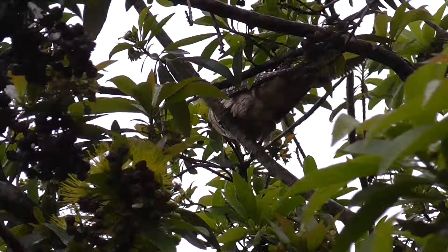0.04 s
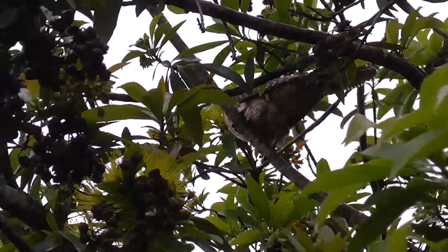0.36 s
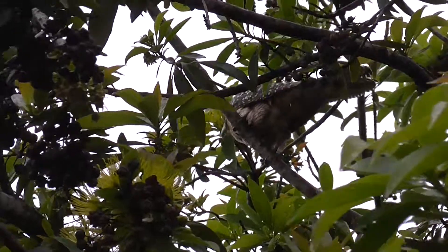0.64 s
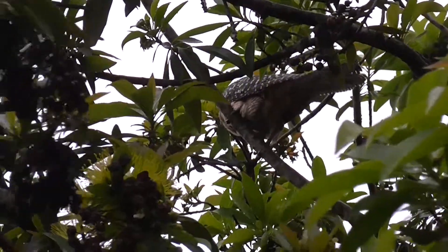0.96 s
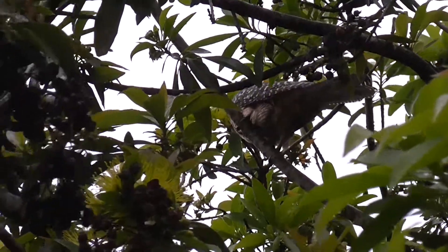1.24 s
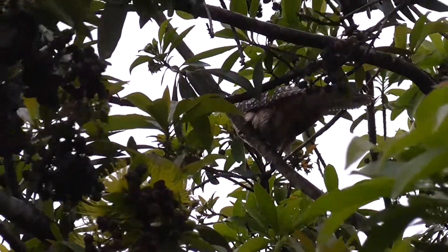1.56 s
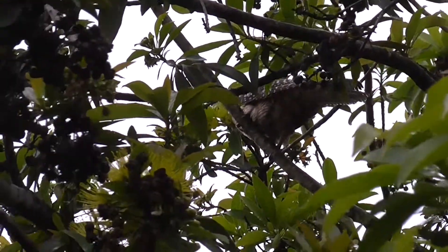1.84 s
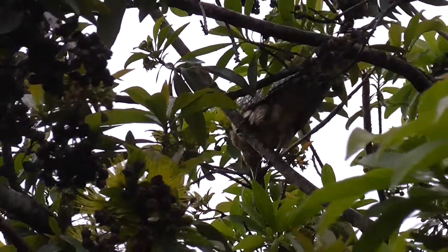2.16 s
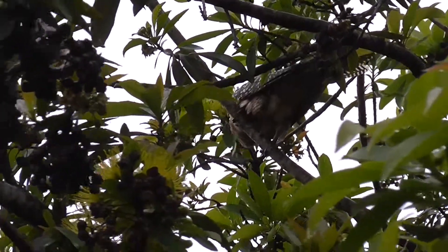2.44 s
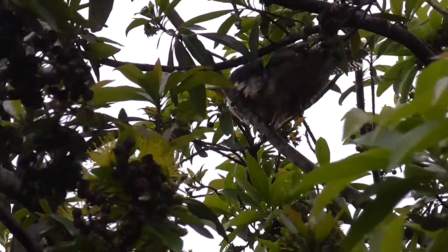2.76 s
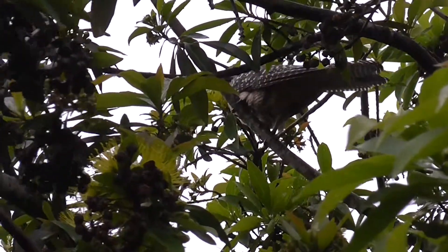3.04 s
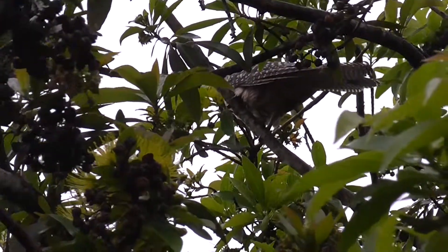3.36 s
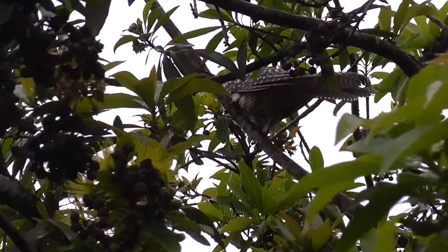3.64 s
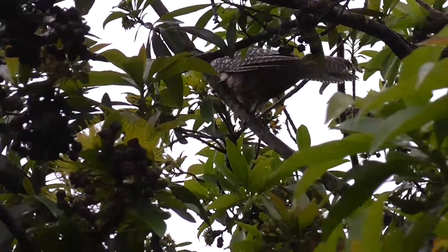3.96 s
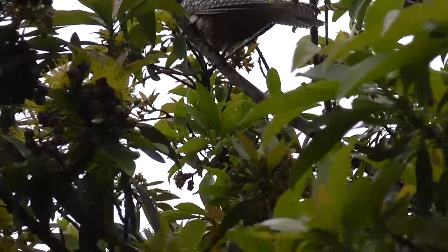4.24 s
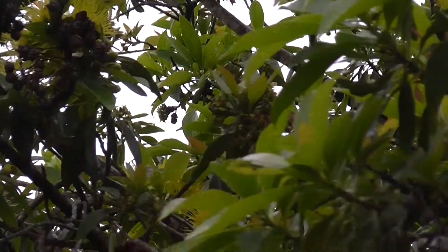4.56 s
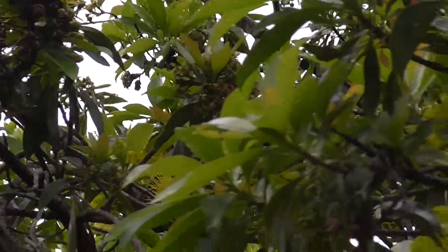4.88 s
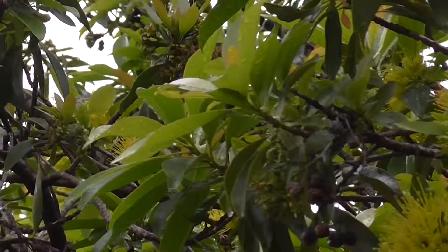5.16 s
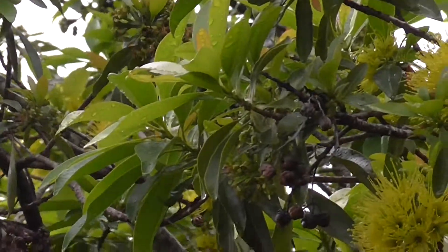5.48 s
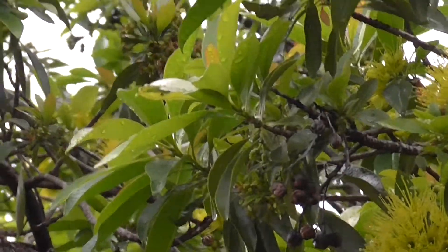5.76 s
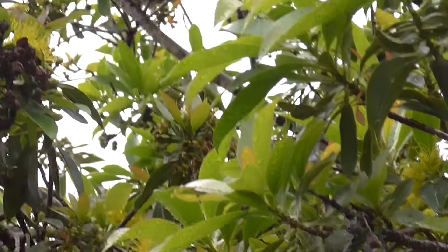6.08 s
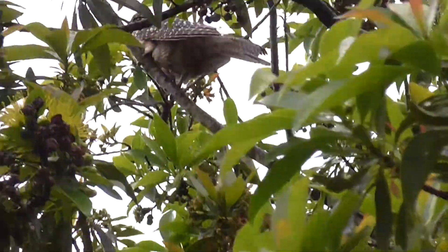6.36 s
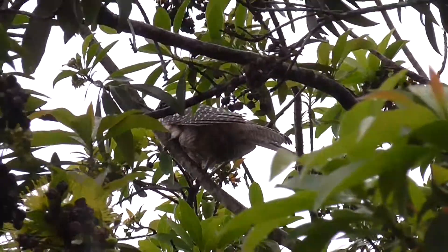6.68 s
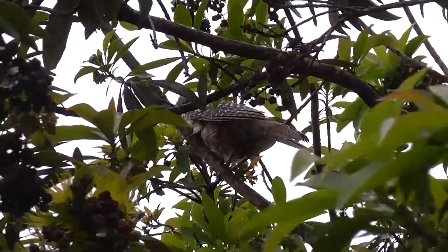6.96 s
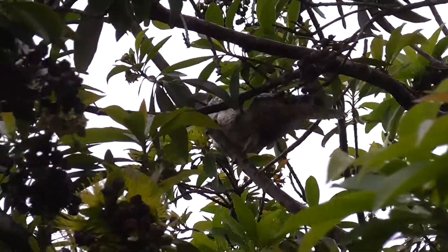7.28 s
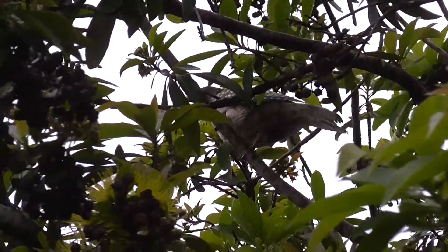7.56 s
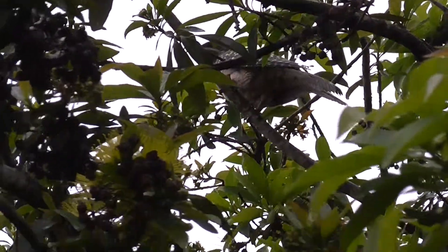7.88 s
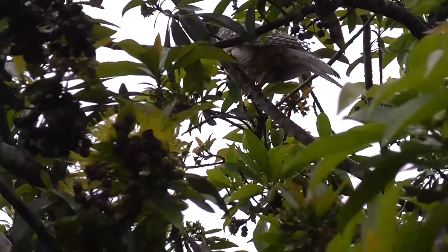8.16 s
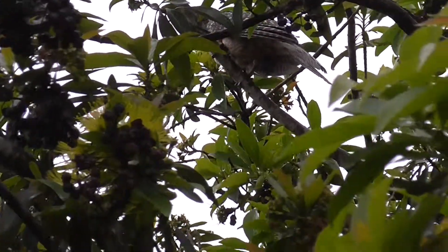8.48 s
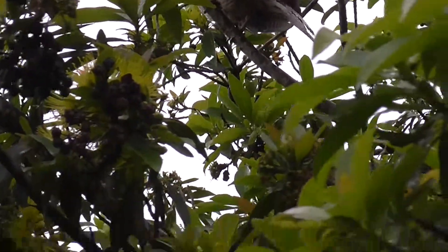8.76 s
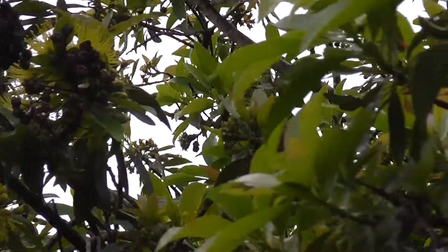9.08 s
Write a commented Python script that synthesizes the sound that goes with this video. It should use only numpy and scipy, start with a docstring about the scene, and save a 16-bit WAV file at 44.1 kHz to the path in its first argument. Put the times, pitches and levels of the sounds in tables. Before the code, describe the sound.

A koel shrieks close to the microphone in a leafy roadside tree. From the start until about 2.3 seconds it gives nine loud, harsh yelps in quick series, some short and arched, others cracking upward in pitch, the last ones weaker, each ringing briefly. A steady low traffic rumble dips under the calls and swells back afterwards. From about 2.6 to 4.5 seconds fainter birds whistle and whine nasally, with two clearer squeals just after 4 seconds. An engine hums on the road, changes gear near 3.5 seconds, climbs slowly, and drops again near 8 seconds. Twigs tick lightly now and then from about 3 seconds, and leaves rustle softly, most between 5 and 7.5 seconds. A faint low whine comes at 8.5 seconds, then the koel shrieks twice more, at about 8.7 and 9 seconds.

```python
"""Koel in a roadside tree

Close to the microphone a koel shrieks: short arched yelps and longer ones that crack upward in pitch,
each scattered by the branches. Fainter birds whine and whistle, leaves tick and rustle, and on the road
nearby an engine climbs slowly and changes gear. The camera's gain control ducks the steady background
under the shrieks and lets it swell back in the long pause."""
import sys
import numpy as np
from scipy import signal
from scipy.fft import rfft, irfft, next_fast_len
from scipy.io import wavfile
from scipy.ndimage import uniform_filter1d, minimum_filter1d, map_coordinates

SR = 44100
rng = np.random.default_rng(int(sys.argv[2]) if len(sys.argv) > 2 else 0)


def bounce(signal):
    """Save signal as a 16-bit WAV file at the path given by the first command-line argument."""
    frames = np.transpose(np.atleast_2d(signal))
    limited = np.clip(frames, -1, 1)
    pcm = np.round(limited * 32767).astype(np.int16)
    wavfile.write(sys.argv[1], SR, pcm)


N = 402191
TIME = np.arange(N) / SR


def amp(db):
    """Decibels to gain."""
    return 10 ** (np.asarray(db) / 20)


def unit(x):
    """Scale to rms 1."""
    return x / np.sqrt(np.mean(x ** 2) + 1e-20)


def along(points, hz):
    """Read (f/Hz, value) points on a log frequency axis."""
    f, v = np.transpose(points)
    return np.interp(np.log(hz + 1), np.log(np.abs(f) + 1), v)


def timeline(points):
    """Read (t/s, value) points at every sample."""
    return np.interp(TIME, *np.transpose(points))


def wobble(rate, size=N):
    """A smooth random curve, rate knots a second."""
    knots = rng.standard_normal(int(size * rate / SR) + 4)
    return map_coordinates(knots, [np.arange(size) * rate / SR])


def sine(hz):
    """A sine that follows a changing pitch."""
    return np.sin(2 * np.pi * np.cumsum(hz) / SR)


def filtered(x, response):
    """Filter x by a gain given as a function of frequency."""
    size = next_fast_len(N + SR // 2)
    return irfft(rfft(x, size) * response(np.fft.rfftfreq(size, 1 / SR)), size)[..., :N]


def coloured(x, points):
    """Filter x by (f/Hz, gain/dB) points."""
    return filtered(x, lambda hz: amp(along(points, hz)))


def spread(pair, side_db):
    """Two unrelated signals as the middle and the sides of a stereo image."""
    return pair[0] + amp(side_db) * np.array([pair[1], -pair[1]])


def rush(spectrum, side_db):
    """Coloured stereo noise of rms 1."""
    return unit(spread(coloured(rng.standard_normal((2, N)), spectrum), side_db))


# Reverberation in the tree's crown and in the garden around it: f/Hz, t60/s
CANOPY_DECAY = [(300, 0.069), (2000, 0.18), (6000, 0.26), (14000, 0.34)]
GARDEN_DECAY = [(300, 1.6), (2300, 1.01), (5000, 1.1), (14000, 0.3)]
def scatter(x, decay, side_db):
    """A diffuse stereo tail in which each frequency dies at its own speed."""
    hz, t, spectra = signal.stft(rng.standard_normal((2, SR)), SR, nperseg=256)
    tail = signal.istft(spectra * amp(-60 * t / along(decay, hz)[:, None]), SR, nperseg=256)[1]
    tail = spread(tail / np.linalg.norm(tail[0]), side_db)
    return signal.fftconvolve(np.pad(x, (SR // 200, 0))[None], tail, axes=1)[:, :N]


# Engine on the nearby road, dropping at each gear change: t/s, firing rate/Hz
FIRING_RATE = [(0, 138.1), (3.45, 134.5), (3.72, 116.2), (4.02, 111.8), (4.4, 126), (5, 128), (6.1, 139.4),
               (7.6, 157.7), (7.82, 147.7), (8.05, 121.9), (9.12, 122.5)]
def exhaust(pipe_hz=127, pipe_width_hz=11.8, arrival_s=4.1, approach_s=1.86):
    """An engine draws near; its exhaust booms as the firing rate passes the pipe's resonance."""
    firing_hz = timeline(FIRING_RATE)
    away = np.clip((arrival_s - TIME) / approach_s, 0, 1)
    boom = amp(-37.5 - 23 * away) / np.hypot(1, (firing_hz - pipe_hz) / pipe_width_hz)
    sway = amp(0.74 * wobble(5.2))
    return boom * sway * np.sqrt(2) * sine(firing_hz * (1 + 0.00766 * wobble(14)))


# Traffic roar as it reaches the tree: f/Hz, relative level/dB
ROAR_SPECTRUM = [(15, -60), (25, -46), (52, -15), (102, -5), (140, -4.5), (189, -9.5), (475, -8.5),
                 (616, -9.5), (1750, -27), (2460, -38.5), (3000, -58), (3900, -46), (6600, -120)]
# Pitch of a far-off drone: t/s, f/Hz
DRONE_PITCH = [(3.2, 540), (4.2, 479)]
def traffic(hum_hz=72.2):
    """The road's steady background: a broad roar, a low hum and a faint drone."""
    hum = amp(-5.5 + 2.3 * wobble(3.52)) * sine(hum_hz * (1 + 0.016 * wobble(6.6)))
    drone = amp(-6) * wobble(25) * sine(timeline(DRONE_PITCH))
    roar = amp(3.5 + 1.16 * wobble(8.3)) * rush(ROAR_SPECTRUM, side_db=-7.5)
    return amp(-44) * (roar + hum + drone)


def patchy(x, depth_db):
    """Random patches of gain over frequency and time: each brushing leaf has its own colour."""
    spectra = signal.stft(x, nperseg=256)[2]
    patches = rng.standard_normal(spectra.shape[1:])
    for _ in range(2):
        patches = uniform_filter1d(uniform_filter1d(patches, size=9, axis=0), size=14, axis=1)
    return unit(signal.istft(spectra * amp(depth_db * unit(patches)), nperseg=256)[1][:, :N])


def crackle(per_s, scatter_db, t60):
    """Many tiny leaf contacts of uneven size: an envelope of rms 1."""
    contacts = (rng.random(N) < per_s / SR) * amp(scatter_db * np.clip(rng.standard_normal(N), -2, 2))
    decay = amp(-60 * np.arange(SR // 10) / SR / t60)
    power = signal.fftconvolve(contacts ** 2, decay ** 2)[:N]
    return unit(np.sqrt(np.abs(power)))


# Colour of the leaves in the tree: f/Hz, relative level/dB
LEAF_SPECTRUM = [(1000, 4.5), (2200, -4.5), (3500, -1.5), (5200, 2), (8000, 0), (11000, -7.5), (15800, -15)]
# Rise and fall of their rustle: t/s, level/dB
RUSTLE_LEVEL = [(0, -52.5), (2.8, -67), (4.7, -60.5), (5.3, -56), (6.2, -53.5), (7.2, -54.5), (9.12, -63.5)]
def leaves():
    """Leaves brush together in swishes and fine crackles."""
    swish = amp(-0.5 + 1.76 * wobble(23)) * patchy(rush(LEAF_SPECTRUM, side_db=-15.5), depth_db=3)
    grains = amp(-2) * crackle(per_s=150, scatter_db=8.5, t60=0.056) * rush(LEAF_SPECTRUM, side_db=-7.5)
    return amp(timeline(RUSTLE_LEVEL)) * (swish + grains)


def syrinx(calls, harmonics, jitter, flutter_hz, rasp, hoarse, flicker_db=3.2):
    """A membrane buzzes at the pitch; roughness shakes its period and swing and frays the overtones."""
    out = np.zeros(N + SR)
    for call in calls:
        times, *columns = np.transpose(call)
        first = int(times[0] * SR)
        t = np.arange(first, int(times[-1] * SR)) / SR
        hz, db, rough = [np.interp(t, times, column) for column in columns]
        shake = lambda: rough * wobble(flutter_hz, len(t))
        phase = 2 * np.pi * np.cumsum(hz * (1 + jitter * shake())) / SR
        # overtones gain when high or rough; the top ones sink at the onset and as the pitch collapses
        register = np.clip((hz - 2200) / 300, 0, 1)
        slack = np.clip(np.maximum(-np.gradient(hz) * SR / 22000, .7 - (t - t[0]) / 0.012), 0, 1)
        wave = np.sin(phase) * amp(harmonics[0][1])
        for k in range(2, round(harmonics[-1][0]) + 1):
            bright_db = 6 * register + 2 * np.log2(k) * rough - 6 * (k - 2) * slack
            bright_db += flicker_db * wobble(42, len(t))
            gain = amp(np.interp(k, *np.transpose(harmonics)) + bright_db) * (k * hz < SR / 2)
            fray = hoarse * (k - 1) / 2 * (rough + 0.28 * register) * shake()
            wave += gain * np.sin(k * phase + fray)
        edges = np.clip(np.minimum(t - t[0], t[-1] - t) / 0.00093, 0, 1)
        out[first:first + len(t)] += np.sqrt(2) * amp(db) * edges * wave * (1 + rasp * shake())
    return out[:N]


def koel_gesture(start, rise, length, scoop, reached_hz, held_hz, reached_db, held_db, fade_db,
                 rise_rough, held_rough):
    """A call scoops up, cracks to a held note and collapses. Rows: t/s, f/Hz, level/dB, roughness."""
    crack_s, fall_s = .003, .035
    t = np.arange(int(length * SR)) / SR
    slack = np.clip(1 - t / rise, 0, 1)
    held = np.clip((t - rise) / crack_s + .5, 0, 1)
    fall = np.clip(1 - (length - t) / fall_s, 0, 1)
    arch = .02 * (np.sin(np.pi * np.clip((t - rise) / (length - rise), 0, 1)) - .5)
    hz = (1 - held) * reached_hz * (1 - scoop * slack ** 1.6) + held * held_hz * (1 + arch)
    hz += (.72 * reached_hz - hz) * fall ** 1.3
    hz *= 1 + 0.0083 * wobble(78.6, SR)[:len(t)]  # a slight waver
    # the collapse undoes the held note's change of level while it fades
    db = reached_db + (held_db - reached_db) * held * (1 - fall) - 15.5 * slack ** 2 - fade_db * fall ** 2
    rough = (1 - held) * rise_rough + held * held_rough + .4 * slack ** 2 + .5 * fall
    return np.column_stack([start + t, hz, db, np.clip(rough, 0, 1)])


# The koel's voice at the membranes: harmonic number, level/dB
KOEL_HARMONICS = [(1, 0), (2, -16.5), (3, -18), (4, -20), (5, -21), (6, -24), (7, -26.5), (8, -37)]
# Resonances of its throat and open bill: f/Hz, gain/dB
THROAT_RESPONSE = [(600, 5), (1400, -12.5), (2100, 1.5), (2650, -2.5), (3100, 2), (4100, -5), (5200, -5),
                   (6300, -4), (7700, -9.5), (9200, -10), (10300, -6), (11500, -10.5), (12800, -6),
                   (15500, -18)]
def shriek(call, bill_hz, bill_db, lift_db, lift_hz=3970, width_hz=1160):
    """One koel call through the throat and bill; the straining, chaotic membranes add a harsh hiss."""
    buzz = syrinx([call], KOEL_HARMONICS, jitter=0.043, flutter_hz=1220, rasp=0.44, hoarse=6)
    times, _, db, rough = np.transpose(call)
    span = slice(max(int(times[0] * SR) - 256, 0), int(times[-1] * SR) + 256)
    size = len(buzz[span])
    t = (span.start + np.arange(size)) / SR
    hz = np.fft.rfftfreq(2 * size, 1 / SR)
    early = np.clip((t - times[0]) / 0.039, 0, 1) * np.clip((times[-1] - t) / np.ptp(times), 0, 1)
    strain = early * amp(np.interp(t, times, db)) * np.interp(t, times, rough) ** 2
    hiss_db = 4.5 + along([(1500, -0.5), (4500, -1.5), (7000, 13.5), (9500, 3.5), (13000, -44)], hz)
    hiss = rfft(strain * rng.standard_normal(size), 2 * size) * amp(hiss_db)
    bump = lambda centre_hz: np.exp(-((hz - centre_hz) / width_hz) ** 2)
    throat = amp(along(THROAT_RESPONSE, hz) + bill_db * bump(bill_hz) + lift_db * bump(lift_hz))
    buzz[span] = irfft(hiss + rfft(buzz[span], 2 * size) * throat)[:size]
    return buzz


# Koel calls, close to the microphone: t/s, rise/s, length/s, scoop/share of pitch, reached f/Hz,
# held f/Hz, reached level/dB, held level/dB, final fade/dB, rise roughness/0-1, held roughness/0-1,
# bill resonance f/Hz, its gain/dB, lift near the second harmonic/dB
KOEL_CALLS = [ (0.07, 0.021, .100, 0.27, 2157, 2033, -1.5, -9, 21.5, 0.25, 0.23, 5960, 6.5, -1.5),
              (0.394, .063, .158, 0.35, 2160, 2530, -5, -11, 9, 0.26, .14, 6300, 3, -5),
              (0.55, 0.031, .118, 0.25, 2130, 2120, -6, -9, 15, 0.29, .04, 6100, 4.5, 0.5),
              (0.776, 0.053, 0.16, 0.34, 2196, 2563, -4.5, -11, 5, 0.19, 0.05, 5960, 5.5, -4.5),
              (1.002, 0.033, 0.12, .22, 2078, 2133, -7.5, -8.5, 18, 0.37, 0.07, 6500, 11.5, 5),
              (1.236, 0.047, 0.15, 0.36, 2220, 2602, -5.5, -12, 8, 0.26, 0.06, 6570, 4.5, -2.5),
              (1.452, .031, .084, .12, 2208, 2459, -9, -9, 38, 0.33, 0, 6650, 11.5, 2),
              (1.848, .022, .102, .20, 2443, 2516, -13.5, -12.5, 30, 0.41, 0.11, 7100, 12, 5),
              (2.193, 0.031, 0.11, .29, 2020, 2083, -12, -12.5, 19, 0.24, 0.08, 8100, 13.5, 4),
              (8.705, .024, 0.12, .27, 2030, 2033, -8.5, -13.5, 19, 0.25, 0, 5700, 5.5, 3),
              (9.045, 0.022, 0.17, 0.26, 2075, 2060, -5.5, -14.5, 15, 0.08, 0, 5600, 4.5, 1.5)]
# Reflections off trunk, ground and limbs: delay/s, level/dB
TREE_ECHOES = [(.0052, -8), (.0125, -10), (.0215, -35), (.036, -29.5)]
def koel():
    """The near bird: its glides beat against their own echoes, then linger in the garden."""
    voice = amp(-4) * sum(shriek(koel_gesture(*call), bill_hz, bill_db, lift_db)
                          for *call, bill_hz, bill_db, lift_db in KOEL_CALLS)
    echoes = sum(amp(db) * np.pad(voice, (int(delay * SR), 0))[:N] for delay, db in TREE_ECHOES)
    canopy = amp(1) * scatter(voice, CANOPY_DECAY, side_db=-11.5)
    garden = amp(-21) * scatter(voice, GARDEN_DECAY, side_db=-9)
    return voice + echoes + canopy + garden


def notes(table, droop, fade_db=0):
    """Gliding notes; both ends sag by droop and fade_db. Rows: t/s, f/Hz, level/dB, roughness."""
    progress = np.linspace(0, 1, 50)
    ends = (2 * progress - 1) ** 4
    for start, length, first_hz, last_hz, mid_db, swell_db, rough in table:
        hz = (first_hz + (last_hz - first_hz) * progress) * (1 - droop * ends)
        db = mid_db + swell_db * (progress - .5) - fade_db * ends
        yield np.column_stack([start + length * progress, hz, db, np.full_like(hz, rough)])


# Far whistles; nearer, high squeals, nasal whines and one low, drawn-out whine:
# t/s, length/s, first f/Hz, last f/Hz, level/dB, swell/dB, roughness/0-1
WHISTLE_NOTES = [(2.61, 0.093, 1270, 1402, -61.5, 1, 0.069), (2.99, 0.11, 1645, 1833, -67.5, 0, .05),
                 (3.12, 0.087, 1667, 1626, -68.5, -19, 0.11), (3.29, 0.062, 1410, 1520, -58, 8, 0.16),
                 (3.79, 0.117, 1356, 1503, -58.5, 2, 0.12), (4.02, .06, 1475, 1520, -64.5, -8, 0.25),
                 (4.47, 0.077, 1255, 1328, -61, 11, .18)]
SQUEAL_NOTES = [(3.44, 0.044, 2255, 2450, -60.5, 5, 0.3), (3.65, .06, 2410, 2193, -66.5, -3, 0.52),
                (4.193, 0.064, 2190, 2062, -47, 9, .12), (4.255, 0.072, 2222, 2124, -44.5, -7, 0.26)]
WHINE_NOTES = [(3.84, 0.119, 1161, 1193, -59, 5, 0.23), (3.95, 0.1515, 1176, 1210, -54.5, 4, 0.15),
               (4.345, 0.19, 1102, 1106, -58, 4, 0.16)]
LOW_NOTES = [(8.55, .16, 781, 810, -60, 26.1, 0.059)]
# Timbre of each voice, interpolated between rows: harmonic number, level/dB
WHISTLE_HARMONICS = [(1, 10.5), (2, -38), (3, -31)]
SQUEAL_HARMONICS = [(1, -4), (2, -1), (3, -18), (4, -20.5), (6, -35)]
WHINE_HARMONICS = [(1, 0), (2, -2), (3, -0.5), (5, -4.5), (6, -19), (7, -14), (8, -13), (10, -26),
                   (12, -33)]
LOW_HARMONICS = [(1, 2.5), (2, 1), (3, -19), (4, -15), (5, -26), (6, -11), (7, -35), (8, -12.5), (12, -22)]
def other_birds():
    """Whines and squeals from the next branches; whistles from farther off also ring in the garden."""
    whines = syrinx(notes(WHINE_NOTES, droop=0.0324), WHINE_HARMONICS,
                    jitter=0.051, flutter_hz=622, rasp=1, hoarse=3.3)
    squeals = syrinx(notes(SQUEAL_NOTES, droop=0.027, fade_db=23), SQUEAL_HARMONICS,
                     jitter=0.03, flutter_hz=407, rasp=0.72, hoarse=0.7)
    low_whine = syrinx(notes(LOW_NOTES, droop=0.0215), LOW_HARMONICS,
                       jitter=0.039, flutter_hz=392, rasp=0.47, hoarse=0.8)
    whistles = syrinx(notes(WHISTLE_NOTES, droop=0.034, fade_db=1), WHISTLE_HARMONICS,
                      jitter=0.076, flutter_hz=119, rasp=0.28, hoarse=0.8)
    voices = whines + squeals + low_whine + whistles
    canopy = amp(0.5) * scatter(voices, CANOPY_DECAY, side_db=-8)
    garden = amp(-7) * scatter(whistles, GARDEN_DECAY, side_db=-2.5)
    return amp(4.5) * voices + canopy + garden


# Twig and leaf ticks in the tree: t/s, level/dB, body relative to snap/dB, t60/s
TWIG_TICKS = [(2.761, -41, 4, 0.085), (2.88, -33, 9.5, 0.022), (3.139, -40, -21, 0.056),
              (3.608, -39.5, -10, 0.052), (3.766, -45, -14, 0.076), (5.835, -39, 5.5, 0.31),
              (6.3, -40, -3, .13), (6.451, -39, -20, 0.19), (7.241, -37, -22, 0.13),
              (7.576, -34.5, -20, .033), (7.664, -36.5, 0, 0.056), (7.932, -40.5, 7, 0.25),
              (8.23, -34, -6, 0.036), (8.39, -41, -26, 0.15)]
def twigs():
    """Each tick is a dying noise burst, a bright snap over a duller body, scattered by the crown."""
    t = np.arange(SR // 5) / SR
    snaps, bodies = np.zeros((2, N + SR))
    for start, db, body_db, t60 in TWIG_TICKS:
        burst = amp(db - 6.5 - 60 * t / t60) * rng.standard_normal(len(t))
        snaps[int(start * SR):][:len(t)] += burst
        bodies[int(start * SR):][:len(t)] += amp(body_db) * burst
    ticks = coloured(snaps[:N], [(1500, -42), (4000, 3.5), (9000, 0), (15000, -18)])
    ticks += coloured(bodies[:N], [(600, 15), (1400, 9.5), (3500, -6.5), (7000, -55)])
    return ticks + amp(-5) * scatter(ticks, CANOPY_DECAY, side_db=-5)


def scene():
    """At the tree: birds close by, over the road and the foliage."""
    return koel() + other_birds() + exhaust() + traffic() + leaves() + twigs()


# What the camera's gain control listens to: f/Hz, gain/dB
DETECTOR_RESPONSE = [(500, -16), (2100, 0.5), (2600, 6.5), (6000, 9)]
def gain_control(x, ceiling_db=-16.5, sense_s=0.035, hold_s=0.18, recover_db_per_s=23.5):
    """The gain drops quickly when the sensed level passes the ceiling, holds, then climbs back."""
    sense, hold = int(sense_s * SR), int(hold_s * SR)
    power = uniform_filter1d(coloured(x, DETECTOR_RESPONSE) ** 2, sense)
    level_db = 10 * np.log10(np.abs(power) + 1e-12)
    cut_db = np.minimum(ceiling_db - level_db, 0)
    held_db = minimum_filter1d(cut_db, hold, origin=(hold - 1) // 2, mode="nearest")
    climb_db = recover_db_per_s * TIME
    gain_db = np.minimum.accumulate(held_db - climb_db) + climb_db
    return amp(uniform_filter1d(gain_db, sense // 2 + 1))


# Stereo width of the camera's microphones: f/Hz, side gain/dB
MICROPHONE_WIDTH = [(60, -4.5), (300, -6), (4500, 4.5), (8000, -2), (14000, 11.5)]
def record(dry):
    """The camera's sound opens a moment late, is widest in the treble, rides its gain, is band-limited."""
    open_s, top_hz = .077, 15850
    left, right = dry * (TIME > open_s)
    mid = (left + right) / 2
    side = coloured((left - right) / 2, MICROPHONE_WIDTH)
    ducked = gain_control(mid) * np.array([mid + side, mid - side])
    return filtered(ducked, lambda hz: hz < top_hz)


dry = scene()
out = record(dry)
bounce(out)
```